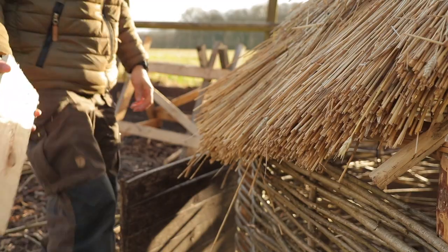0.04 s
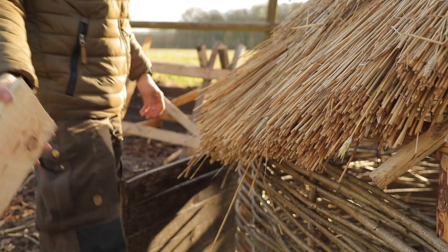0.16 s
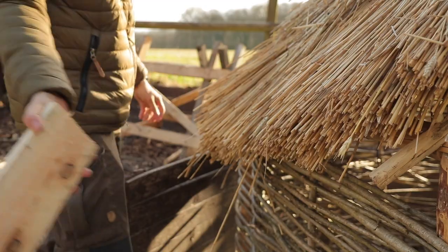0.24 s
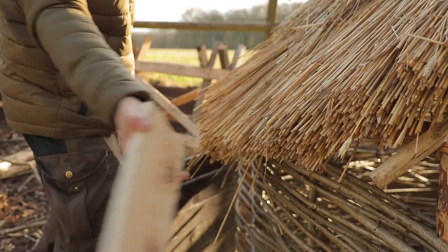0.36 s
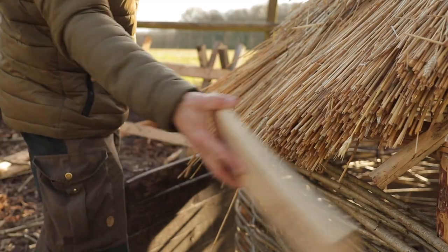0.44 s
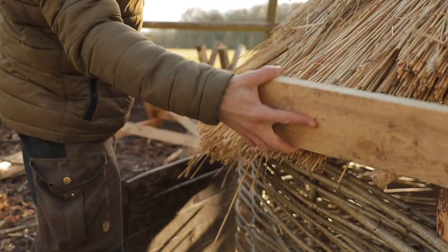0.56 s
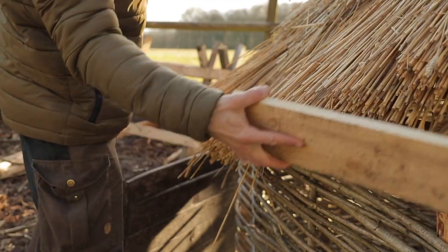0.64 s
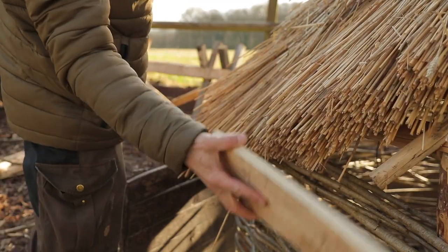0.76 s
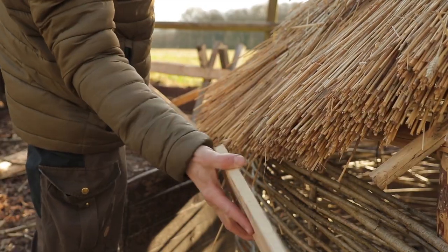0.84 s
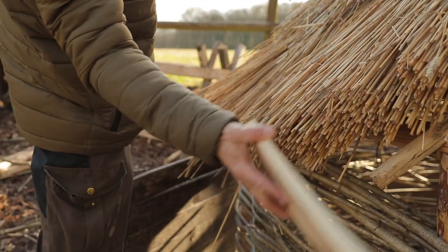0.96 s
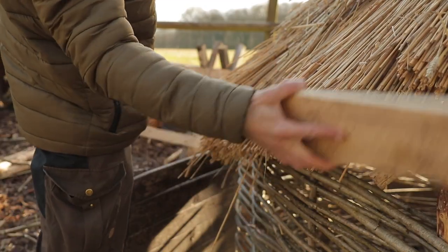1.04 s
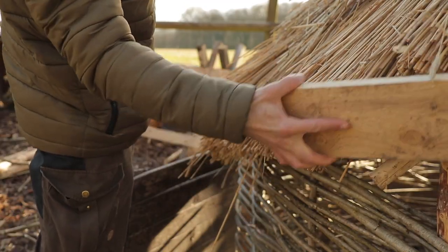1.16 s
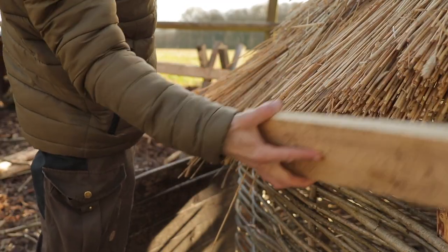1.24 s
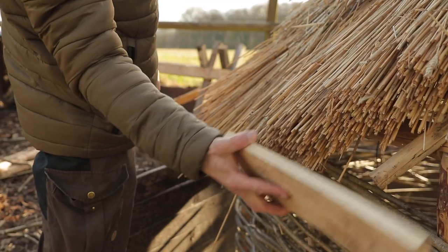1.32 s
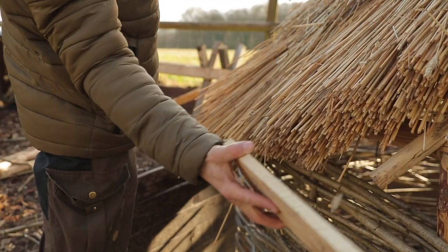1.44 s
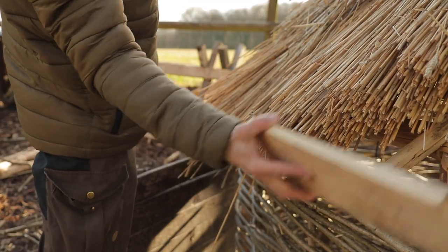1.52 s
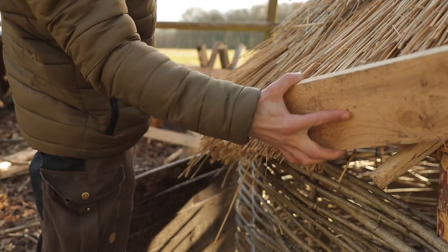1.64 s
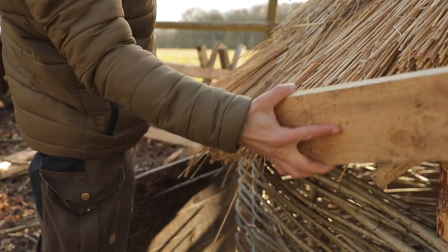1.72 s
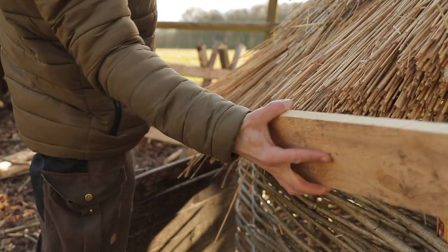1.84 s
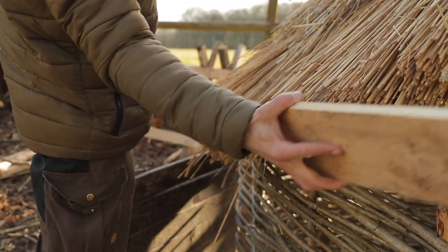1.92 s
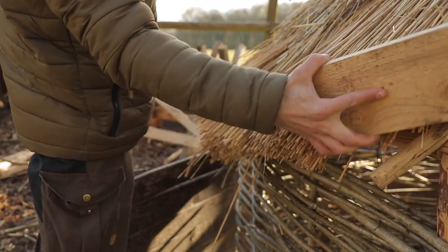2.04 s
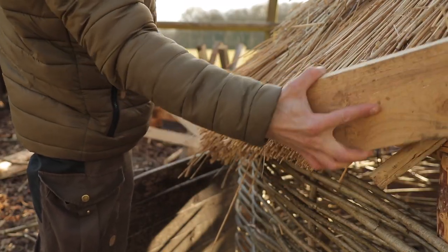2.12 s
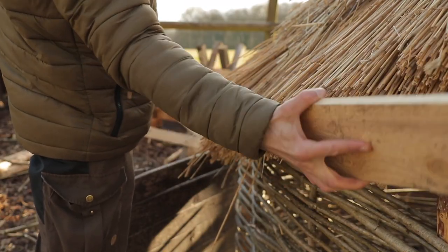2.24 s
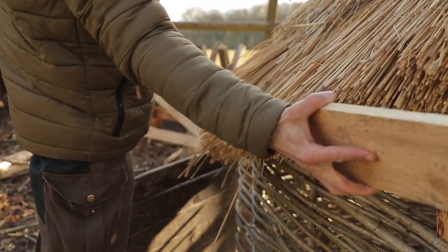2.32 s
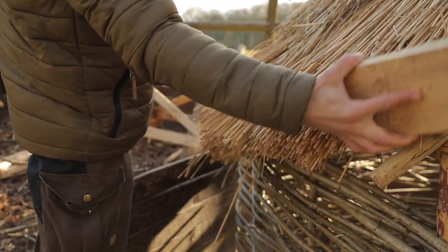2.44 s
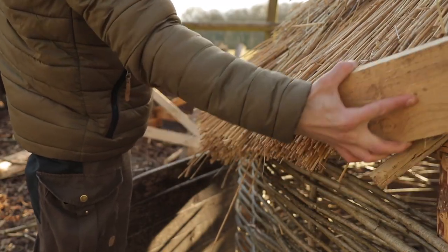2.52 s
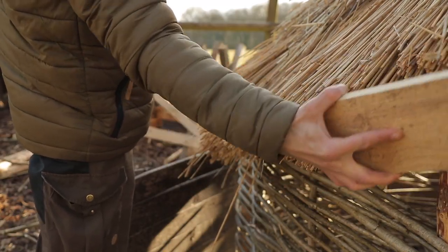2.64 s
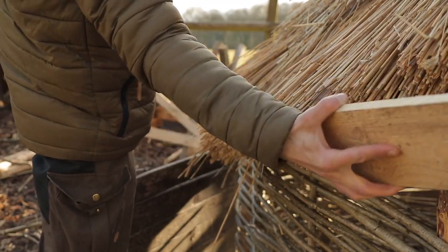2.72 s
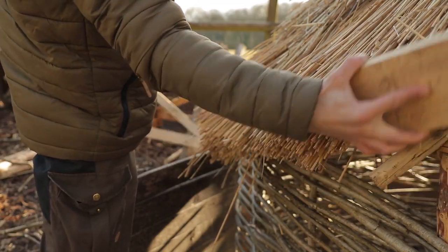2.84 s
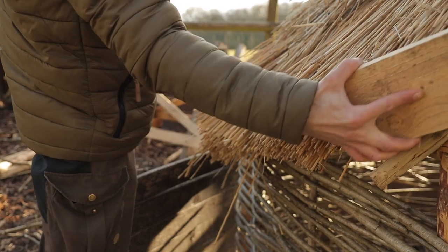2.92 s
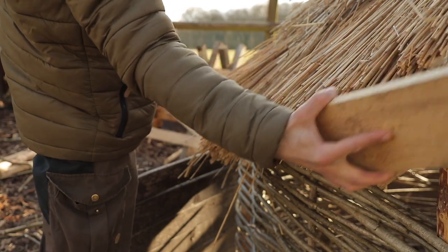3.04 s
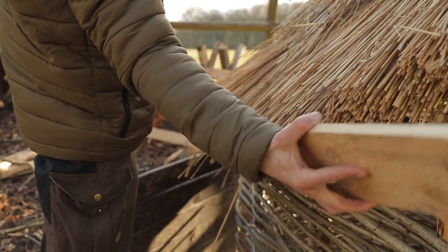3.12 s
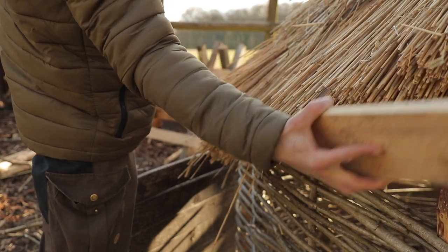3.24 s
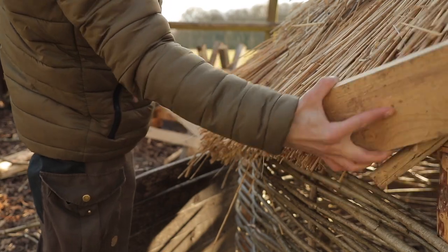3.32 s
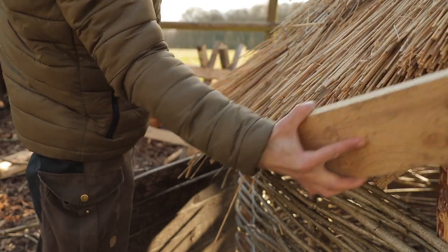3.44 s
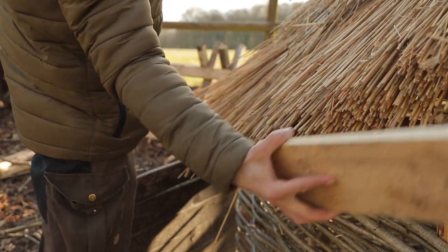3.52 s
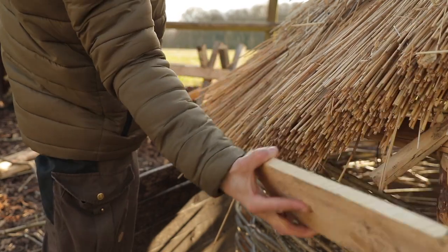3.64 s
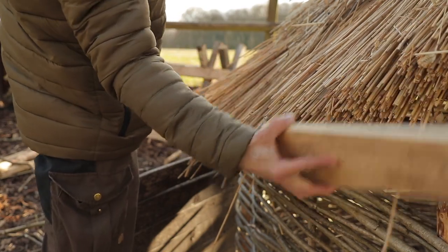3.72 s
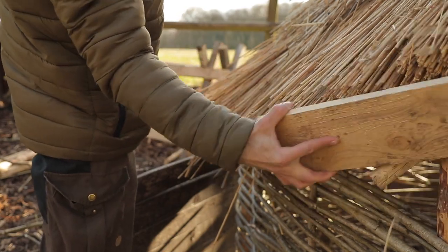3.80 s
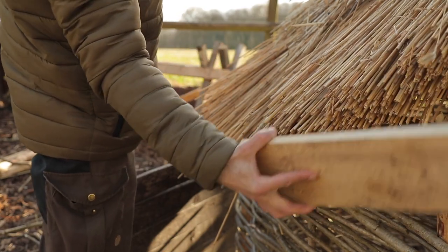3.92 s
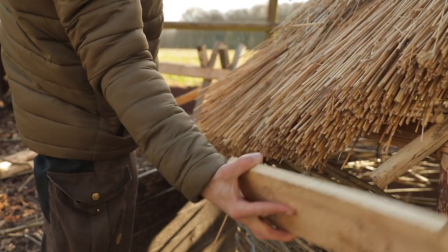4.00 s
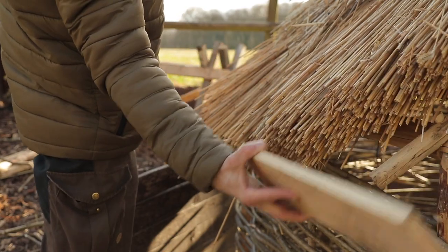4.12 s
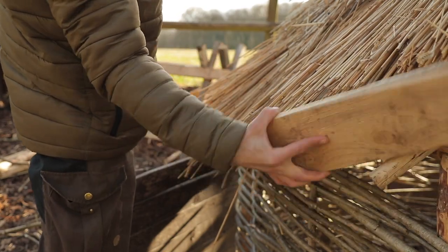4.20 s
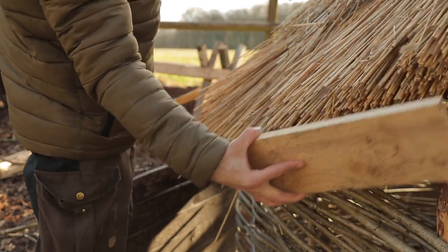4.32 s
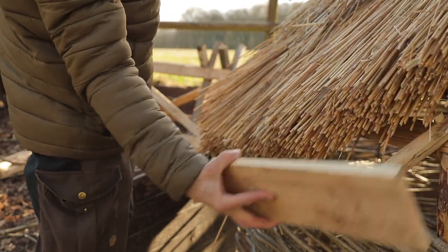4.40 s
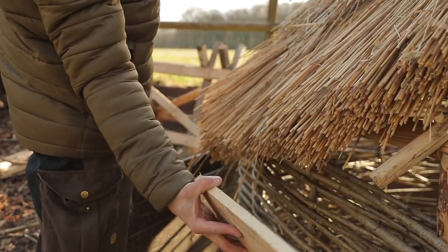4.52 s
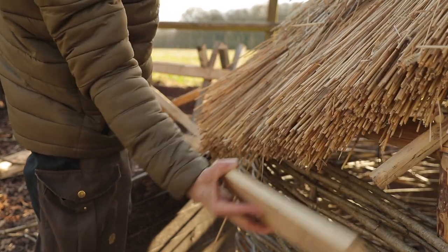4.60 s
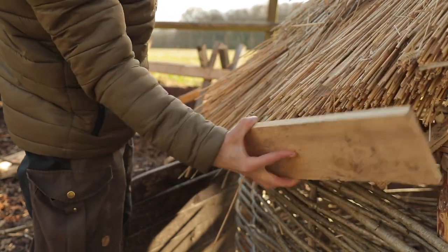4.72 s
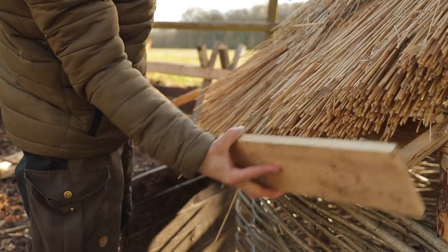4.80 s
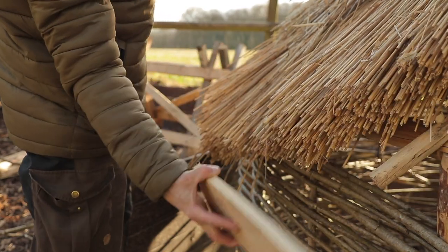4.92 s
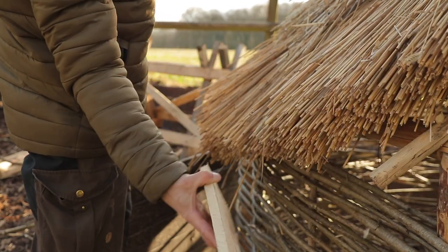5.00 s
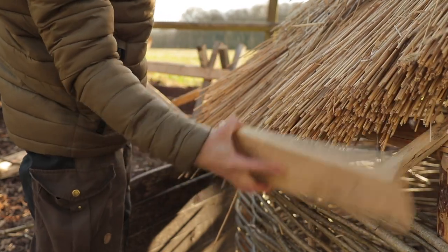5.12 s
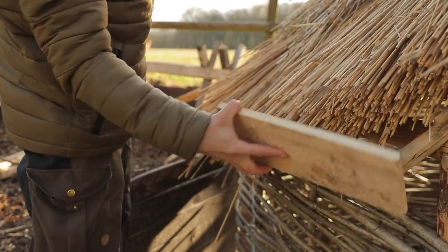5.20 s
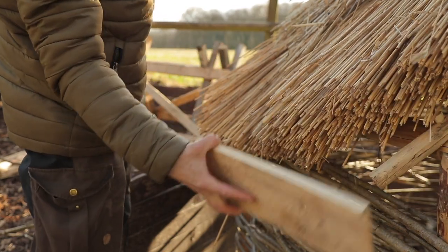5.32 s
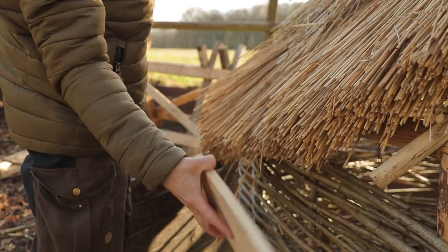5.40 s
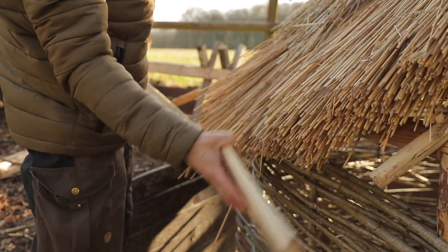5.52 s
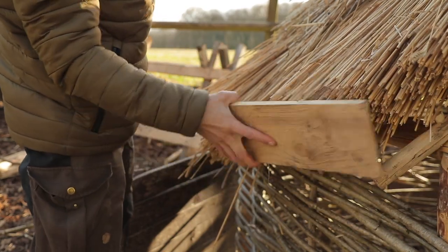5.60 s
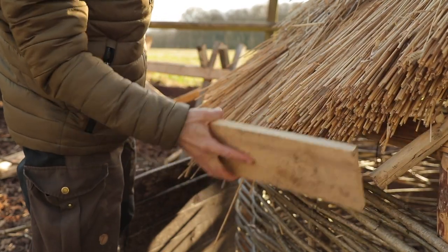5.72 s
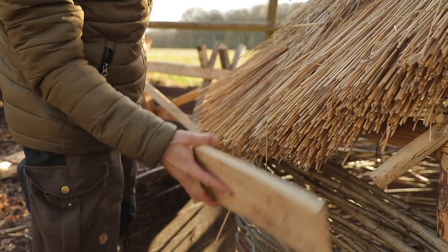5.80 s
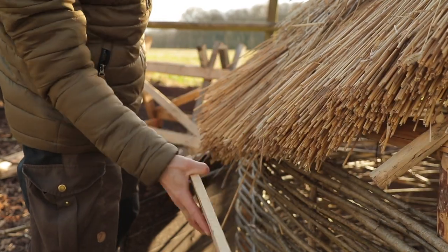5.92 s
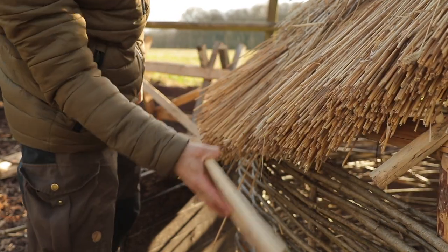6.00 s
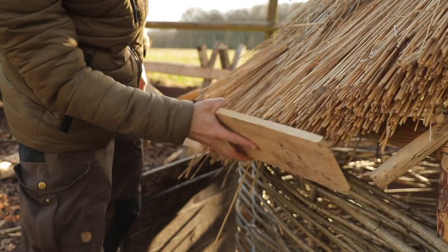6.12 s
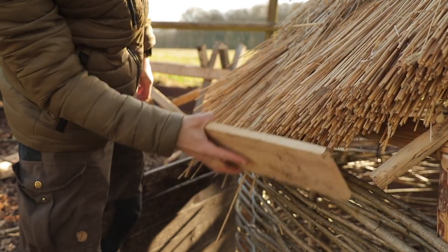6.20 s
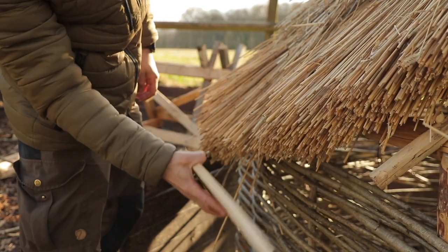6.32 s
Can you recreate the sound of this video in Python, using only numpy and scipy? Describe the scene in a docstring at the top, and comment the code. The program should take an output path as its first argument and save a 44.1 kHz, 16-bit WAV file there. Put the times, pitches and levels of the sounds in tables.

```python
"""Knocking thatch flush with a bat

A thatcher steps up to the eaves and knocks the reed ends flush with a flat wooden bat, thirteen times.
In each blow the bat meets a few proud stems, then the whole bundle: damped board modes ring on a
low thud and a rustle of filtered clicks. Resonant stem snaps fall between the blows; shaped noise gives the
open yard's rumble and a far bird. The loudest knocks overload the input stage."""
import sys
import numpy as np
from scipy import signal
from scipy.fft import rfft, irfft
from scipy.io import wavfile
from scipy.ndimage import uniform_filter1d

SR = 44100
rng = np.random.default_rng(int(sys.argv[2]) if len(sys.argv) > 2 else 0)


def wav_out(sig):
    """Save sig, one row per channel (or a flat mono array), as 16-bit PCM at SR to the path in sys.argv[1]."""
    wavfile.write(sys.argv[1], SR, np.round(np.clip(np.atleast_2d(sig).T, -1, 1) * 32767).astype(np.int16))


N = 280035  # length in samples
SPAN = 16384  # samples in one blow, snap or tap


def amp(db):
    """Decibel law: converts a level in dB to an amplitude factor."""
    return 10 ** (np.asarray(db) / 20)


def read(points, hz):
    """Logarithmic pitch scale: interpolates a frequency table along log frequency."""
    f, value = np.transpose(points)
    return np.interp(np.log(hz + 1), np.log(f + 1), value)


def evened(x):
    """Equal power: scales to rms 1."""
    return x / np.sqrt(np.mean(x ** 2) + 1e-20)


def burst(x):
    """Equal energy: scales a short sound to the energy of 10 ms at rms 1."""
    return x * np.sqrt(SR / 100 / (np.sum(x ** 2) + 1e-20))


def add(mix, s, sound):
    """Superposition: adds a sound into the mix at time s."""
    part = mix[max(round(s * SR), 0):][:len(sound)]
    part += sound[:len(part)]


def colour(x, points):
    """Minimum-phase filtering: the log gain fixes the phase, so the response is causal."""
    log_gain = np.log(amp(read(points, abs(np.fft.fftfreq(4096, 1 / SR)))))
    taps = np.fft.ifft(np.exp(np.conj(signal.hilbert(log_gain)))).real
    return signal.fftconvolve(x, taps[:len(taps) // 2])[:len(x)]


def ring(x, hz, t60):
    """Damped resonance: a pole pair whose ringing falls 60 dB in t60."""
    r = np.exp(-np.log(1000) / (t60 * SR))
    return signal.lfilter([1, 0, -1], [1, -2 * r * np.cos(2 * np.pi * hz / SR), r * r], x)


def swing(pressure, hz, t60):
    """Forced mode: its swing builds up under the pressure and dies away exponentially."""
    decay = np.exp(-np.log(1000) / (t60 * SR))
    size = signal.lfilter([1], [1, -decay], pressure)
    turns = hz * np.arange(len(size)) / SR + rng.random()
    return burst(size * np.sin(2 * np.pi * turns))


def grains(t, per_s, spread_db):
    """Random impulse train: clicks of uneven size and either sign at a mean rate."""
    size = amp(spread_db * np.minimum(rng.exponential(1, len(t)), 4))
    sign = rng.choice([-1, 1], len(t))
    return size * sign * (rng.random(len(t)) < per_s / SR)


def stems(t, per_s, spread_db, count=10):
    """Bank of resonators: ticks from many stems or folds, ringing at scattered pitches."""
    pitches = np.linspace(800, 15000, count) + rng.uniform(-500, 500, count)
    stem_t60_s = 0.0015
    return sum(ring(grains(t, per_s / count, spread_db), hz, stem_t60_s) for hz in pitches)


def contacts(pressure):
    """Broadband excitation: many stem contacts under a pressure curve feed all frequencies about alike."""
    force = pressure * rng.standard_normal(len(pressure))
    gate = np.sqrt(np.minimum(pressure * 10, 1))
    for _ in range(2):
        z = rfft(force)
        local_power = uniform_filter1d(abs(z) ** 2, size=40)
        force = irfft(z / np.sqrt(local_power + 1e-12)) * gate
    return force


# distant outdoor wash, relative spectrum: (f/Hz, level/dB)
AIR = [(60, -33.5), (120, -28.5), (200, -7.5), (370, -5), (700, -9), (1000, -10), (1500, -16), (2200, -25),
       (2900, -28), (3800, -25), (4800, -41), (8000, -45.5), (16000, -55.5)]
# low rumble, relative spectrum: (f/Hz, level/dB)
RUMBLE = [(12, -11), (25, -10), (45, -2.5), (95, 0), (130, -8.5), (200, -15), (350, -30.5), (900, -63)]
# slow swell of the rumble, rms: (t/s, level/dB)
RUMBLE_DB = [(0, -45.5), (.5, -47), (.9, -43.5), (1.4, -48.5), (2.4, -44), (3.5, -51.5), (4.1, -46),
             (4.9, -45.5), (5.4, -42), (5.9, -43), (6.35, -36.5)]
AIR_DB = -57.5  # rms


def outdoors():
    """Stationary noise: spectrally shaped distant air over a slowly swelling rumble."""
    hz = np.fft.rfftfreq(N, 1 / SR)
    t = np.arange(N) / SR

    def shaped_noise(shape):
        return evened(irfft(rfft(rng.standard_normal(N)) * amp(read(shape, hz)), N))

    air = shaped_noise(AIR)
    rumble = shaped_noise(RUMBLE)
    swell = amp(np.interp(t, *np.transpose(RUMBLE_DB)))
    return amp(AIR_DB) * air + swell * rumble


# a far bird's whistles: (t/s, f/Hz)
WHISTLES = [(3.25, 4420), (3.48, 4100), (5.12, 4500), (5.34, 4390), (5.89, 4150)]
WHISTLE_S, WHISTLE_DB = 0.07, -74.5  # length; rms before the fades


def whistle(hz):
    """Narrow-band noise: two resonances in series leave a thin note, blurred by distance."""
    count = int(WHISTLE_S * SR)
    breath = rng.standard_normal(count)
    note = ring(ring(breath, hz, .012), hz, .008)
    return amp(WHISTLE_DB) * evened(note) * signal.windows.tukey(count)


# small dry crackles of cloth and straw, relative spectrum: (f/Hz, level/dB per Hz)
CLOTH = [(300, -1), (1000, 7.5), (3500, 5.5), (5000, -5.5), (8000, -9), (11000, -15.5), (16000, -16.5)]
# jacket: loud while stepping up, quiet in the first blows, back as the arm swings wider: (t/s, level/dB)
JACKET_DB = [(0, -71), (.22, -59), (.45, -64), (.67, -66), (.76, -78), (2.8, -81), (3.4, -69), (6.35, -70)]
CRINKLE_DB, CRINKLE_S = 1.5, 0.082  # the folds give way in clumps: depth and spacing


def jacket():
    """Crackling noise: padded cloth crinkles in clumps as the thatcher moves."""
    t = np.arange(N) / SR
    knots = np.arange(0, N / SR, CRINKLE_S)
    clumps = np.interp(t, knots, rng.standard_normal(N)[:len(knots)])
    folds = stems(t, per_s=2300, spread_db=1.5)
    crinkle = colour(amp(CRINKLE_DB * clumps) * folds, CLOTH)
    return amp(np.interp(t, *np.transpose(JACKET_DB))) * evened(crinkle)


# boots on litter and the swinging sleeve, level before a 2 dB cut: (t/s, time scale/s, level/dB, centre f/Hz)
SCUFFS = [(.125, 0.053, -70.5, 5900), (.19, 0.037, -45.5, 410), (.195, 0.071, -64, 1960),
          (.399, 0.04, -54, 1700), (.43, 0.035, -50.5, 810), (.455, 0.062, -52.5, 412)]


def scuff(length, db, hz):
    """Friction noise: a short gritty rub of dense clicks through one broad resonance."""
    t = np.arange(int(2 * length * SR)) / SR
    stroke = t / length * np.exp(-4 * t / length)
    grit = grains(t, per_s=21000, spread_db=3.0)
    return amp(db - 2.0) * evened(ring(stroke * grit, hz, 6 / hz))


# a light wooden knock as the thatcher steps up: (t/s, lowest mode f/Hz, level of that mode/dB)
TAPS = [(.226, 833, -39.5)]


def tap(hz, db):
    """Modal synthesis: a double push drives three damped wooden modes."""
    t = np.arange(SPAN) / SR
    push = np.exp(-t / 0.0015) + 0.51 * np.exp(-.5 * ((t - .009) / 0.00034) ** 2)
    low = swing(push, hz, 0.015)
    middle = amp(0.5) * swing(push, 1.1 * hz, 0.025)
    high = amp(-6.5) * swing(push, 1.55 * hz, 0.012)
    return amp(db) * (low + middle + high)


TICKS_PER_S, TICK_T60_S = 3, .014
TICK_DB, TICK_SPREAD_DB, TICK_HZ = -70.5, 4, 5200  # mid level, spread either way, mid pitch


def ticks():
    """Uniform random arrivals: faint snaps of disturbed straw, as rows (t/s, level/dB, f/Hz, t60/s)."""
    rows = []
    for when, size, pitch in rng.random((round(TICKS_PER_S * N / SR), 3)):
        db = TICK_DB + TICK_SPREAD_DB * (2 * size - 1)
        hz = TICK_HZ * 2 ** (pitch - .5)  # within half an octave
        rows.append((when * N / SR, db, hz, TICK_T60_S))
    return rows


# dry stems snapping, t60 of the driving pressure: (t/s, level/dB, f/Hz, t60/s)
SNAPS = [(.295, -61, 3700, .026), (.402, -54, 1800, .053), (.431, -63.5, 7900, .02),
         (1.037, -52, 3680, .014), (1.292, -54.5, 4630, 0.0069), (1.533, -48, 3460, .05),
         (1.866, -44.5, 950, 0.017), (2.342, -51, 3300, 0.022), (2.427, -55.5, 3500, .008),
         (4.213, -50.5, 1900, 0.015), (4.671, -57.5, 2800, 0.0098), (5.621, -60.5, 3200, .015)]


def snap(db, hz, t60):
    """Brittle fracture: a quick run of splinters gives a short ring over a broad tick."""
    t = np.arange(SPAN) / SR
    crack = ring(contacts(amp(-60 * t / t60)), 1.1 * hz, 1.5 / hz)
    tick = colour(crack, CLOTH)
    stem = ring(crack, hz, 12 / hz)
    return amp(db) * (amp(-6.5) * burst(stem) + amp(-1.5) * burst(tick))


# stems sliding on each other, relative spectrum: (f/Hz, level/dB per Hz)
RUSTLE = [(200, -15.5), (1000, 0.5), (3300, -3.5), (5000, -8.5), (8000, -11), (11000, -14.5),
          (14000, -14.5), (16000, -16)]
# the first swing sweeps in and out through straws that hang loose: (t/s, length/s, level/dB)
SWEEPS = [(.54, .02, -39.5), (.61, .085, -54)]
BRUSH_S = .016  # loose straws meet the board this long before the first touch


def brush(length, db):
    """Random impacts: loose straws flick across the board."""
    t = np.arange(int(length * SR)) / SR
    flicks = signal.windows.tukey(len(t), .4) * grains(t, per_s=3100, spread_db=6.0)
    return amp(db) * burst(colour(flicks, RUSTLE))


# echo decay of the yard: (f/Hz, t60/s)
YARD = [(150, .2), (600, .28), (1500, .28), (3300, .26), (8000, .25), (16000, .2)]


def yard(x):
    """Scattering: quick echoes from ground and eaves, then a faint open-air tail, drawn anew each call."""
    t = np.arange(SR // 2) / SR
    near = grains(t, per_s=2100, spread_db=0) * (t > .005) * np.exp(-t / 0.011)
    hz, when, z = signal.stft(rng.standard_normal(len(t)), SR, nperseg=256)
    decay = amp(-60 * when / read(YARD, hz)[:, None])
    far = signal.istft(z * decay, SR, nperseg=256)[1][:len(t)]
    far *= np.minimum(t / .02, 1)
    echo = amp(-16.5) * near / np.linalg.norm(near) + amp(-35.0) * far / np.linalg.norm(far)
    return x + signal.fftconvolve(x, echo)[:len(x)]


# reed ends striking the board, relative spectrum: (f/Hz, level/dB per Hz)
CLATTER = [(100, -15), (450, -1.5), (620, 5), (1000, 3.5), (1600, 4.5), (2300, -2.5), (3300, -2),
           (4200, -8), (5200, -13.5), (7000, -25.5), (10000, -38.5), (16000, -44.5)]
# bending modes of the hand-held board, relative: (f/Hz, level/dB)
BOARD = [(551, -20), (660, -32), (754, -22), (885, -33), (1000, -32.5), (1210, -25), (1460, -16.5),
         (1590, -43), (1820, -24), (1925, -22.5), (2700, -21), (3062, -15), (3230, -27.5), (3640, -24)]
# ring time of the board before the FREEDOM factor: (f/Hz, t60/s)
BOARD_T60 = [(550, .075), (1450, .055), (3000, .04)]
# blows: (full contact t/s, first touch t/s, touch against the full blow level/dB, contact spread t/s,
#   force level/dB, flatness from 0 = on its edge to 1 = whole face, thud of the bundle f/Hz,
#   note that the landing spot favours f/Hz, low, middle and high board modes level/dB,
#   loose straw on the way in level/dB)
BLOWS = [ (0.583, .5687, -9, 0.0034, -1.5, 0.55, 214, 1516, -8, -9.5, -9.5, -48),
         (1.13, 1.124, -5.5, 0.0026, 2.5, 0.88, 300, 620, -4.5, 3.5, -3.5, -53),
         (1.66, 1.644, -22.5, 0.002, 0, 0.99, 213, 862, 3.5, 7.5, 2, -64.5),
         (2.095, 2.078, -9, 0.0031, -0.5, 0.83, 215, 1900, -5.5, 4, -6.5, -67),
         (2.514, 2.5049, -6, 0.0028, -1.5, 0.91, 205, 1929, -1.5, -23.5, -11, -47.5),
         (2.911, 2.9026, -14.5, 0.0024, 1, 0.96, 250, 545, -3, -0.5, -3.5, -52.5),
         (3.3603, 3.3559, -8.5, 0.0014, 0.5, 0.68, 200, 1006, 0, 5, -12, -51),
         (3.8131, 3.7949, -20, 0.0019, 0, 1, 325, 386, 3, -10, -2.5, -62.5),
         (4.264, 4.254, -11, 0.0015, 2.5, 0.79, 220, 881, 2.5, -4.5, 7, -73),
         (4.74, 4.7296, 4.5, 0.00088, -1, 0.72, 270, 1278, -0.5, 6.5, 1, -67),
         (5.2018, 5.198, -5, 0.0032, 3, 0.96, 290, 569, 12, 12, 1.5, -72),
         (5.651, 5.6461, 1.5, .0017, 0, 0, 276, 2758, 3, 2, 4, -73),
         (6.1379, 6.135, 1, 0.001, -1, 0.17, 230, 1583, 2, 9.5, -1.5, -53)]
# levels and ring factor by how flat the board lands: (on its edge, with the whole face)
CLATTER_DB, THUD_DB, FAVOURED_DB = (-15.5, -14), (-38, -18), (-14.5, -19)  # before the force level
CRUNCH_DB, SETTLE_DB = (-25, -29), (-33, -39)  # before the force and touch terms
FREEDOM = (0.8, 0.35)  # factor on the board's ring time
CRUNCH_PER_DB = 0.4  # dB of crunch per dB of force
CUSHION, SETTLE_CUSHION = 0.3, .05  # dB of crunch and of settling lost per dB that the first touch takes
# the proud stems crack at the first touch: level at 0 dB touch, dB per dB of touch, pitch
CRACK_DB, CRACK_SHARE, CRACK_HZ = -33, .3, 3000


def blow(full_s, touch_s, touch_db, spread, force_db, flat, thud_hz, favoured_hz, low_db, mid_db, high_db):
    """Impact on a yielding body: the bat grazes proud stems, then lands on the bundle, which settles."""
    clatter_db, thud_db, favoured_db, crunch_db, settle_db, freedom = (
        np.interp(flat, [0, 1], ends)
        for ends in (CLATTER_DB, THUD_DB, FAVOURED_DB, CRUNCH_DB, SETTLE_DB, FREEDOM))
    t = np.arange(SPAN) / SR
    late = t - (full_s - touch_s)  # s after full contact

    def landing(width):
        return np.exp(-.5 * (late / width) ** 2)

    def after(fade_s):
        return (late > 0) * np.exp(-abs(late) / fade_s)

    push = amp(touch_db) * np.exp(-t / 0.0033) + landing(spread)
    force = contacts(push + amp(-17) * after(0.0093))
    clatter = amp(clatter_db) * burst(colour(force, CLATTER))
    crack = snap(CRACK_DB + CRACK_SHARE * touch_db, CRACK_HZ, t60=0.046)

    # the whole bundle takes one short shove and swings about once
    shove = landing(0.0013) * np.cos(2 * np.pi * thud_hz * late)
    thud = -amp(thud_db) * burst(ring(shove, thud_hz, 0.007))
    favoured = amp(favoured_db) * swing(push, favoured_hz, 0.015)

    # the spot where the board lands decides which modes speak; lying flat on the reeds damps them
    spot = [(750, low_db), (1460, mid_db), (2700, high_db)]
    board = np.zeros(SPAN)
    for hz, db in BOARD:
        mode = swing(push ** 2, hz, freedom * read(BOARD_T60, hz))
        board += amp(db + read(spot, hz)) * mode

    # driven stems crunch just after the landing
    driven = np.exp(-.5 * ((late - .0008) / spread) ** 2) + amp(-4.5) * after(0.0094)
    crushed = colour(driven * grains(t, per_s=19000, spread_db=0.5), RUSTLE)
    crunch = amp(crunch_db + CRUNCH_PER_DB * force_db - CUSHION * touch_db) * burst(crushed)

    # then they slide back, and a few stragglers tick into place
    sliding = after(0.028) * stems(t, per_s=8300, spread_db=2.5)
    stragglers = after(.11) * stems(t, per_s=900, spread_db=2.2)
    settled = colour(sliding + amp(-8) * stragglers, RUSTLE)
    settle = amp(settle_db - SETTLE_CUSHION * touch_db) * burst(settled)

    # the jolt spreads through the roof, where deeper stems chatter softly
    chatter = after(0.054) * grains(t, per_s=3400, spread_db=2.0)
    roof = amp(settle_db - 8) * burst(ring(chatter, 3100, 0.0041))
    return amp(force_db) * (clatter + thud + favoured) + amp(-5.5) * board + crack + crunch + settle + roof


def scene():
    """Superposition: all sources add at one microphone."""
    mix = jacket() + outdoors()
    small = np.zeros(N)  # the slighter sounds share one yard echo
    for full_s, touch_s, *landing, brush_db in BLOWS:
        add(small, touch_s - BRUSH_S, brush(BRUSH_S, brush_db))
        add(mix, touch_s, yard(blow(full_s, touch_s, *landing)))
    sources = ((WHISTLES, whistle), (SCUFFS, scuff), (TAPS, tap), (SNAPS + ticks(), snap), (SWEEPS, brush))
    for table, source in sources:
        for s, *row in table:
            add(small, s, source(*row))
    return (mix + yard(small))[None]


EDGE_HZ = 15780  # upper band limit


def record(dry):
    """Saturation, then band limiting: the input stage rounds off the highest peaks before a low-pass."""
    ceiling = .73
    squashed = dry / (1 + (dry / ceiling) ** 6) ** (1 / 6)
    low_pass = signal.firwin(301, EDGE_HZ, window=("kaiser", 9), fs=SR)
    return signal.oaconvolve(squashed, low_pass[None], "same")


dry = scene()
out = record(dry)
wav_out(out)
```